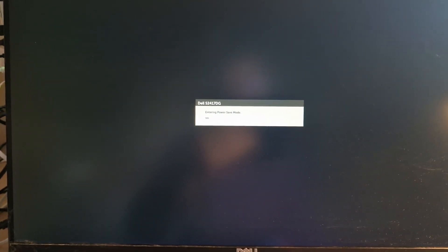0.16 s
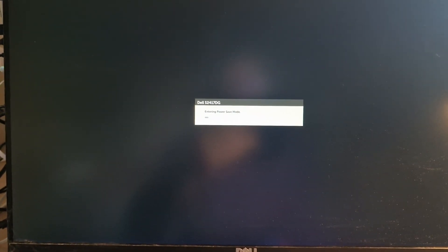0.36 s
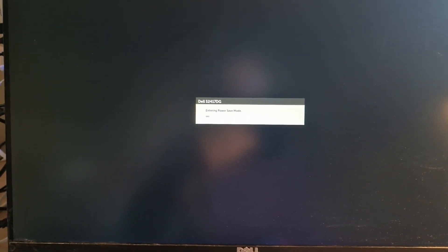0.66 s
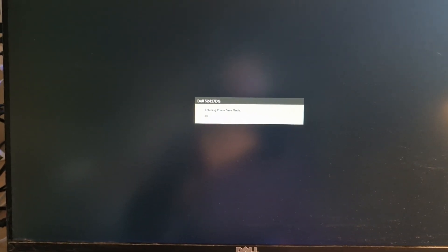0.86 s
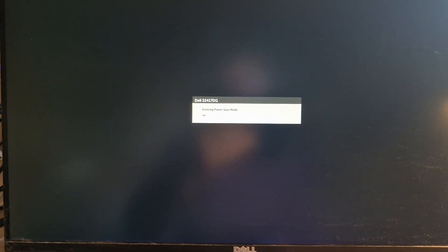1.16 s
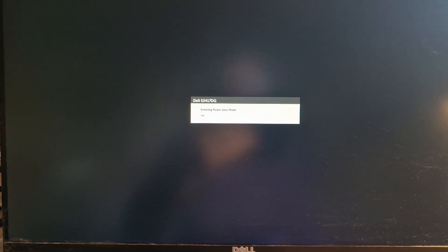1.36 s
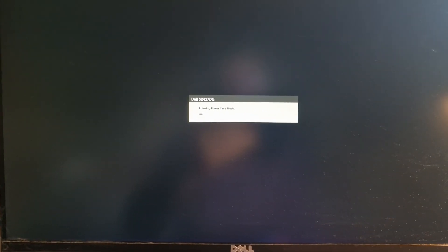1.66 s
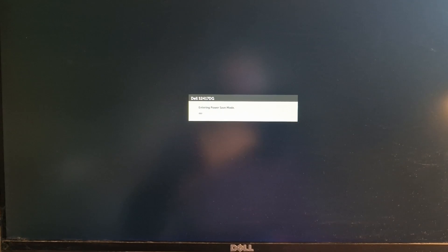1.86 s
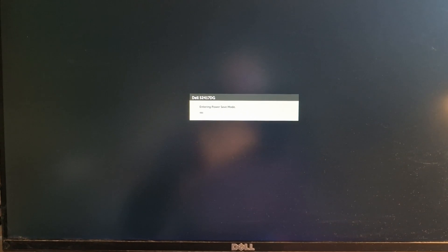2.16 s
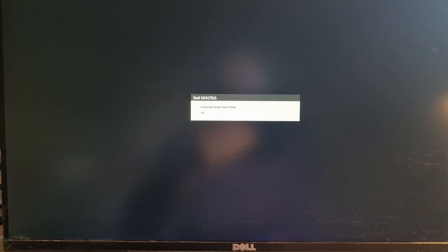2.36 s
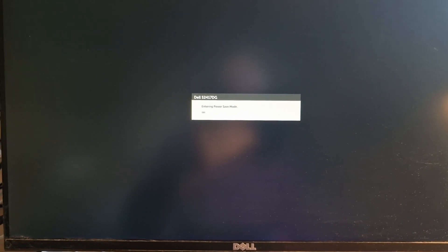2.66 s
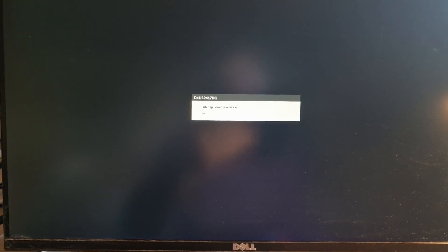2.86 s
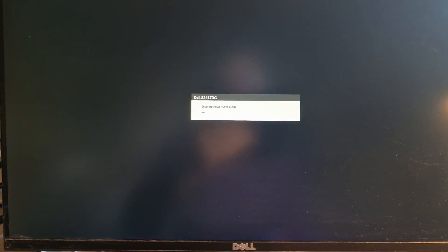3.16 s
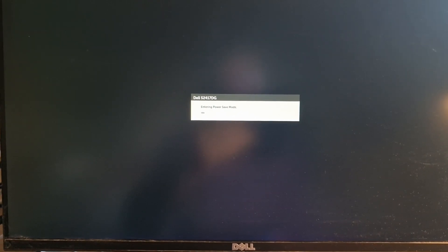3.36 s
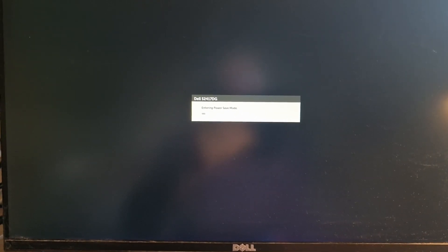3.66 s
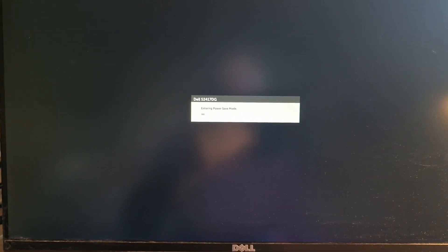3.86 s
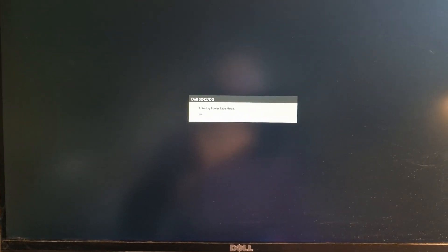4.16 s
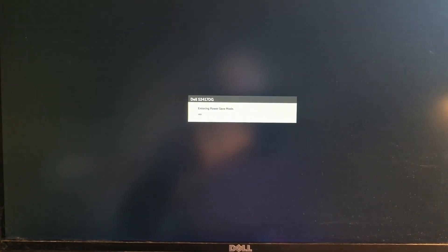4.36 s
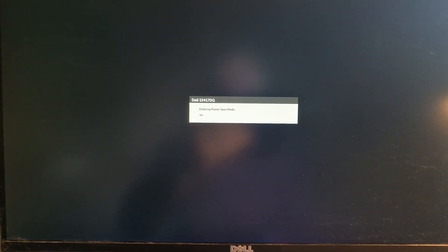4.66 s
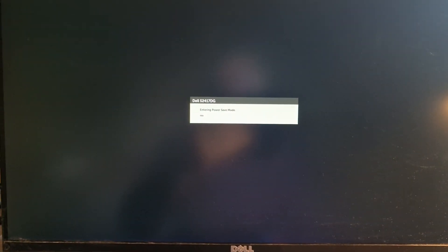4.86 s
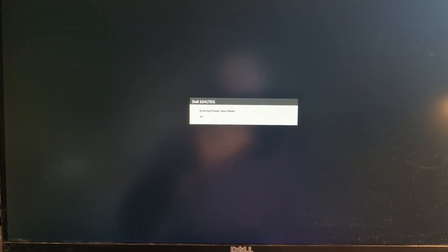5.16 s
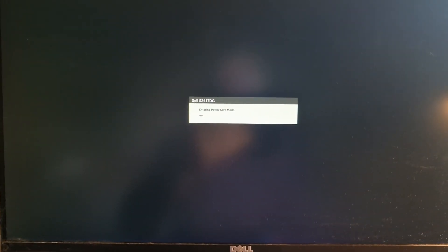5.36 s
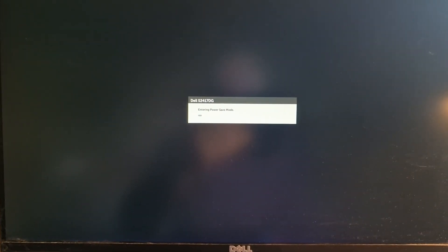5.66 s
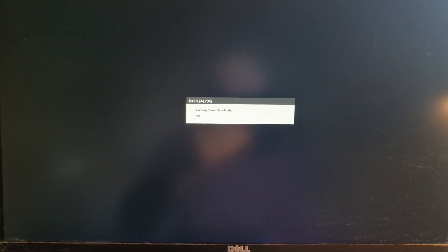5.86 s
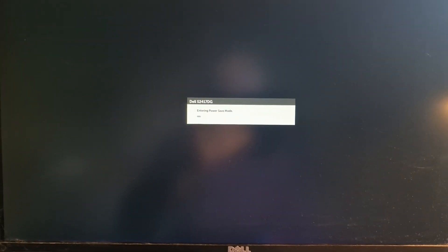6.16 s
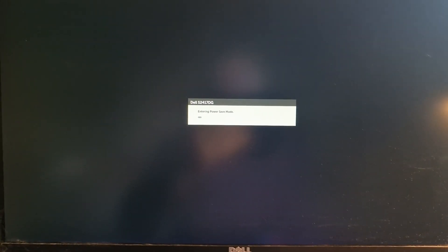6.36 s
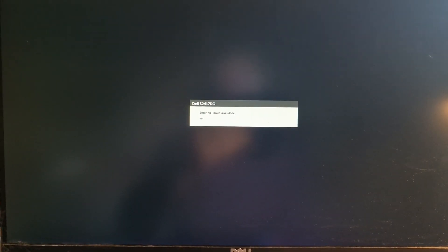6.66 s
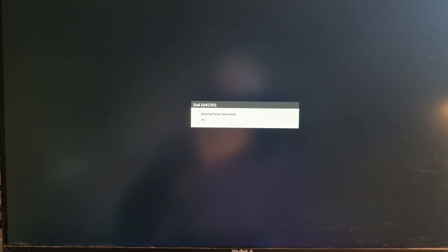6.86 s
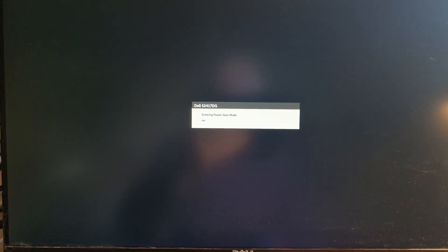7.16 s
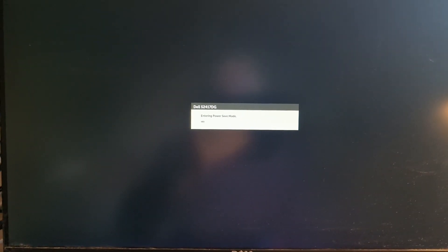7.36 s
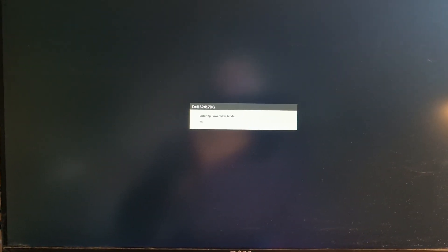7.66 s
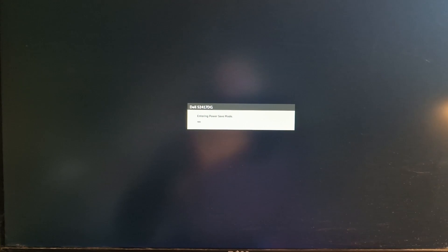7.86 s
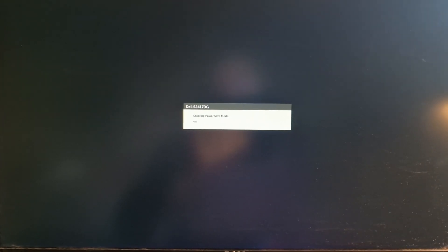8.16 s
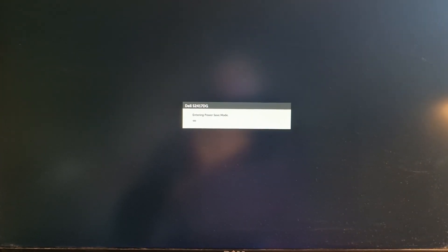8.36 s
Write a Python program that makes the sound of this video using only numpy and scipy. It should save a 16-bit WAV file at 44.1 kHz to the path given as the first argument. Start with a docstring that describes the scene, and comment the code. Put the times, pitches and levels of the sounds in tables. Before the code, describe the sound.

A soft rush of air and droning fan hum swells quickly, holds with a slow beating waver, then sinks and fades at the end.

```python
"""A low rush of air over room rumble is heard first: a desktop computer's twin nine-blade fans, already turning,
speed up past their cruise rate, settle and coast down beside a handheld stereo microphone.
Blade tones are sine pairs that beat; motor orders sweep through resonances of the case; air is shaped noise.
Three small ticks are rung resonances with echoes, panel hums are sines of wandering phase,
and rumble, electrical hum and hiss form a quiet floor."""
import sys
import numpy as np
from scipy import signal
from scipy.fft import rfft, irfft, next_fast_len
from scipy.io import wavfile
from scipy.ndimage import uniform_filter1d, map_coordinates

SR = 44100
rng = np.random.default_rng(int(sys.argv[2]) if len(sys.argv) > 2 else 0)


def persist_wave(psi):
    """Save psi, clipped to +-1, as 16-bit WAV."""
    counts = np.round(np.clip(psi, -1, 1) * 32767).astype(np.int16)
    wavfile.write(sys.argv[1], SR, np.atleast_2d(counts).T)


N = 375291

# Shaft speed commands: t/s, target speed/(turns/s), time constant/s
SPEED_COMMANDS = [(0, 36.64, .866), (1.835, 30.72, .866), (6.95, 0, 3.6)]
START_TURNS_PER_S, CRUISE_TURNS_PER_S, EASE_S = 24.5, 30.72, 0.4  # EASE_S: averaging time of a speed change

# Air flow through the case, scaled by each flow law below: t/s, level/dB
FLOW_LEVEL = [(0, -9), (.5, -3.5), (1, -2), (2, -1), (3, -2.5), (3.5, -1), (6.5, 0.7), (7.2, -4.5),
              (7.6, -8.5), (8, -12.5), (8.51, -14)]
# Flow noise laws: level/dB at cruise and 0 dB flow, dB per dB of flow, power of relative speed
DRONE_LAW, WHIR_LAW, WHOOSH_LAW = (-53, 1.02, 0.1), (-52.5, 0.52, 1.1), (-57, 0.92, 1)
# Blade-tip hiss, same columns
TIP_LAW = (-70, 1.9, 2.7)
# Relative noise spectra of case boom, blade whir, grille whoosh and blade-tip hiss: f/Hz, level/(dB per Hz)
DRONE_SPECTRUM = [(60, -53.5), (100, -29.5), (108, -23), (120, -5), (145, -6.5), (160, -6), (173, 2.5),
                  (185, -6), (196, -13), (210, -10.5), (240, -6), (258, -21.5), (300, -72)]
WHIR_SPECTRUM = [(200, -47.5), (255, -8), (275, -2), (320, 2), (350, -3), (362, -8), (378, -5),
                 (425, -19.5), (520, -23), (700, -36), (900, -65)]
WHOOSH_SPECTRUM = [(330, -32), (425, -5.5), (450, -3.5), (490, -0.5), (527, -1), (565, -3.5), (625, -1.5),
                   (720, -10.5), (769, -6.5), (886, -9.5), (1180, -13), (1390, -10.5), (1530, -17),
                   (1660, -17.5), (1970, -24), (2200, -24.5), (2550, -32.5), (3500, -42.5), (4550, -61.5),
                   (7700, -120)]
TIP_SPECTRUM = [(900, -41), (1450, -6.5), (1630, -1.5), (1970, -7), (2200, -4), (2550, -13.5), (2820, -12),
                (3500, -19), (4500, -29), (5500, -44.5)]
# Slow swell of the drone: t/s, level/dB
DRONE_SWELL_LEVEL = [(0, -3.5), (.7, -1), (1.2, 0), (2.6, -1), (3.2, 1), (4.4, 0), (5.2, 0), (6.2, -2.5),
                     (7, 0.5), (8.51, 2.5)]
# Likeness of the two noise channels: f/Hz, correlation (no unit)
CHANNEL_CORRELATION = [(30, 0.92), (120, 1), (300, 0.9), (450, 1), (650, 0.47), (1000, 0.38), (2000, 0.16),
                       (4000, 0.22), (8000, 0.51)]

# Relative spectra of room rumble and high hiss: f/Hz, level/(dB per Hz)
ROOM_SPECTRUM = [(15, -29), (25, -11), (40, -9), (65, -2.5), (95, -5), (130, -4.5), (280, -4), (420, -27.5),
                 (700, -30.5), (1150, -32), (1350, -20), (1500, -41), (2000, -49), (2600, -55),
                 (4000, -70.5)]
HISS_SPECTRUM = [(1500, -44), (2600, -10.5), (3600, -4.5), (4400, -3), (5300, -1.5), (6000, -4.5),
                 (6600, -1.5), (7300, -0.5), (7700, -5.5), (8200, -35.5), (9000, -50.5)]
# High hiss: t/s, level/dB
HISS_LEVEL = [(0, -81), (.9, -82), (1.3, -78.5), (2.9, -82), (6.5, -82), (7.5, -85.5), (8.51, -86.5)]
# Electrical hum in the room: f/Hz, level/dB
ELECTRICAL_HUM = [(59.8, -84), (120, -73)]

# Slip of the slower twin behind the faster: t/s, blade pitches lost (count)
TWIN_SLIP = [(0, -1), (.53, .5), (.72, 1), (.95, 1.5), (1.15, 2.5), (1.85, 4.5), (2.35, 5.5), (2.75, 6.5),
             (3.06, 7.5), (3.5, 8.5), (4.15, 10.5), (4.4, 11.5), (5.1, 13.5), (5.75, 15.5), (6.12, 16.5),
             (6.7, 18.5), (7.2, 19.5), (7.9, 21), (8.51, 23)]
# Motor torque ripple: t/s, level/dB of the faster fan, level/dB of the slower twin
MOTOR_DRIVE = [(0, -68, -67), (.13, -59, -70), (.22, -55, -66), (.3, -56, -62), (.4, -56, -57),
               (.5, -56, -62), (.68, -56, -69), (.77, -66, -58), (.88, -60, -58), (1.02, -57, -57.5),
               (1.14, -54, -63), (1.2, -63, -62), (1.3, -61.5, -66), (1.55, -66, -64), (1.68, -66, -58),
               (1.9, -68, -62), (2, -74.5, -68.5), (2.55, -71, -66.5), (3, -73.5, -66), (3.7, -71, -64.5),
               (4.2, -68, -74), (4.7, -64, -71.5), (5.7, -63, -71), (6.7, -64, -70), (6.95, -72, -64),
               (7.15, -76, -67.5), (7.4, -84, -77), (8.51, -92, -93)]
# Motor orders: multiple of shaft speed (no unit), relative level/dB
MOTOR_ORDERS = [(32, -8), (36, -5.5), (40, -7), (44, -8.5), (48, -16.5)]
# Case frame modes: f/Hz, width/Hz of one stage, gain/dB for the faster fan, gain/dB for the slower twin
FRAME_MODES = [(990, 36, -10, -23.5), (1056, 44, 0.5, -16), (1103, 36, -7, -8), (1258, 34, -12, 1),
               (1310.4, 60, -6.5, 3), (1359, 60, 1, -4), (1530, 73, -11.5, -12)]
# Waver of the blade tone, then of the shake: t/s, level/dB
BLADE_WAVER = [(0, 0), (.25, 3), (.55, -7), (.75, -3), (1.05, -5.5), (1.3, 2), (1.7, -4.5), (2.1, 0.5),
               (2.5, 4), (2.75, -3.5), (2.9, -4), (3.6, -5), (3.95, 5), (4.27, -13.5), (4.6, 4), (4.95, -4),
               (5.4, 3), (5.95, -5), (6.25, 2.5), (6.6, -4.5), (6.95, 2), (7.15, -8), (7.35, 3.5),
               (7.65, -3), (7.9, 11), (8.2, -9)]
SHAKE_LEVEL_WAVER = [(.9, -5.5), (1.25, 3.5), (1.45, -4.5), (1.65, 0.5), (2.0, 0.5), (2.2, -2), (2.4, 3),
                     (2.6, -8.5)]
BLADES, BLADE_DB, BLADE_POWER = 9, -55.5, 8.24  # count, level at cruise, power of relative speed
TWIN_SHARE, THIRD_DB = 0.66, -78  # amplitude ratio of the twin; third harmonic at 0 dB flow
SHAKE_ORDER, SHAKE_DB = 8, -47  # multiple of the shaft; level on resonance
SHAKE_MODE = (281.7, 19)  # f/Hz, width/Hz of one stage
SHAKE_TWIN, SHAKE_LAG_RAD = 0.35, 3.4  # amplitude ratio of the twin; phase offset of the faster fan

# Ticks: t/s, peak level/dB before panning, left-right level/dB, main f/Hz, its width/Hz, second f/Hz,
# second level/dB, crack level/dB, echo level/dB, time for echoes to fall 60 dB/s
TICK_EVENTS = [(0.2047, -52, 3, 4200, 750, 3200, -1, -18, -29, 0.07),
               (0.2658, -54, 6.5, 7800, 900, 5850, -11, -18, -28, 0.15),
               (1.955, -48, 1.5, 4950, 950, 6500, -15, -23, -30, 0.11)]

# Panel modes: f/Hz, wander rate/Hz (the mode's width), phase wander that differs between ports/rad
THIN_PANEL_MODES = [(275.4, 6.8, 0.13), (531, 24, 0.86), (1335, 70, 1)]
# One swell per panel mode: full from t/s, full until t/s, level/dB, rise/(dB/s), fall/(dB/s)
PANEL_SWELLS = [(7.82, 7.94, -56, 73, 33.5), (3.5, 6.8, -65, 20.5, 11), (7.2, 7.7, -78, 1.5, 12)]

# Left port level over right: f/Hz, level/dB
PORT_LEVEL = [(30, -0.7), (100, 1), (180, 0.5), (300, 0), (520, 0), (890, 4), (1520, 6), (2610, 5.5),
              (4480, 4), (7680, 16)]
# Phase by which the left port leads the right: f/Hz, phase/rad
PORT_LEAD = [(0, -2.5), (260, 0.12), (520, 0.89), (1030, 1.5), (1380, 2), (1810, 5), (2150, 6.5),
             (2840, 6.5), (3790, 10.5), (4390, 12.5), (6030, 15), (6720, 11), (7840, 23.5)]
# Gain that turns unit white noise into converter hiss: f/Hz, level/dB
CONVERTER_GAIN = [(8500, -99), (10000, -99), (11200, -93.0), (11600, -91), (13500, -91.0), (15500, -92.0)]
MIC_HZ, TOP_HZ = 8200, 15700  # microphone cutoff; highest frequency kept


def amp(db):
    """Amplitude ratio: 20 dB is a factor of ten."""
    return 10 ** (np.asarray(db) / 20)


def unit(x):
    """Normalization to unit rms."""
    return x / np.sqrt(np.mean(x ** 2) + 1e-20)


def along(points, hz):
    """Linear interpolation of (f/Hz, value) points on a logarithmic frequency axis."""
    f, value = np.transpose(points)
    return np.interp(np.log(hz + 1), np.log(f + 1), value)


def curves(rows):
    """Linear interpolation in time: one curve for each column after t/s."""
    t, *columns = np.transpose(rows)
    return [np.interp(np.arange(N) / SR, t, column) for column in columns]


def wobble(rate):
    """Band-limited random modulation: a smooth curve through `rate` random knots per second."""
    coarse = np.arange(0, N + 32, 32)
    knots = rng.standard_normal(int(N * rate / SR) + 4)
    return np.interp(np.arange(N), coarse, map_coordinates(knots, [coarse * rate / SR]))


def filtered(x, response):
    """Linear filtering: the spectrum of x times a complex response of frequency."""
    m = next_fast_len(N + SR // 2)
    return irfft(rfft(x, m) * response(np.fft.rfftfreq(m, 1 / SR)), m)[..., :N]


def resonance(f, hz, width):
    """Damped harmonic oscillator: a causal band-pass of unit gain at its centre."""
    return 1j * f * width / (hz * hz - f * f + 1j * f * width)


def rush(spectrum, patchy_db):
    """Turbulent noise: partly correlated channels with patches of random gain, scaled to unit rms."""
    z = signal.stft(rng.standard_normal((2, N + 512)), nperseg=512)[2]
    patches = uniform_filter1d(rng.standard_normal(z.shape[1:]), size=4, axis=0)
    patches = uniform_filter1d(patches, size=14, axis=1)
    pair = signal.istft(z * amp(patchy_db * unit(patches)), nperseg=512)[1][:, :N]

    def mid_side_gain(hz):
        # half the angle whose cosine is the channel correlation
        turn = np.arccos(np.clip(along(CHANNEL_CORRELATION, hz), -1, 1)) / 2
        return amp(along(spectrum, hz)) * [np.cos(turn), np.sin(turn)]

    mid, side = filtered(pair, mid_side_gain)
    return unit(np.array([mid + side, mid - side]))


def shaft():
    """First-order lag: speed in turns per second approaches each command exponentially, then is smoothed."""
    pad = round(EASE_S * SR)
    t = np.arange(-pad, N + pad) / SR
    speed = np.full(len(t), START_TURNS_PER_S)
    for s, goal, lag_s in SPEED_COMMANDS:
        approach = goal + (np.interp(s, t, speed) - goal) * np.exp((s - t) / lag_s)
        speed = np.where((t >= s) | (s == 0), approach, speed)
    return uniform_filter1d(speed, size=pad)[pad:-pad]


def air(speed):
    """Flow noise: turbulence booms in the case, whirs at the blades and whooshes through the grilles."""
    (flow_db,) = curves(FLOW_LEVEL)
    (swell_db,) = curves(DRONE_SWELL_LEVEL)
    pace = speed / CRUISE_TURNS_PER_S

    def law(db, per_flow, power):
        return amp(db + per_flow * flow_db) * pace ** power

    drone = law(*DRONE_LAW) * amp(swell_db + 0.79 * wobble(8.7)) * rush(DRONE_SPECTRUM, patchy_db=1.5)
    whir = law(*WHIR_LAW) * amp(0.46 * wobble(5.0)) * rush(WHIR_SPECTRUM, patchy_db=1.87)
    whoosh = law(*WHOOSH_LAW) * amp(0.14 * wobble(4.4)) * rush(WHOOSH_SPECTRUM, patchy_db=1.5)
    # blade-tip hiss grows steeply with speed
    tips = law(*TIP_LAW) * amp(0.65 * wobble(5.2)) * rush(TIP_SPECTRUM, patchy_db=2.5)
    return drone + whir + whoosh + tips


def background():
    """Superposition of independent sources: room rumble, wavering electrical hum and high hiss."""
    (hiss_db,) = curves(HISS_LEVEL)
    t, waver = np.arange(N) / SR, wobble(6.7)
    rumble = amp(-68.0) * rush(ROOM_SPECTRUM, patchy_db=1.5)
    hum = sum(amp(db + 1.2 * waver) * np.sqrt(2) * np.sin(2 * np.pi * hz * t) for hz, db in ELECTRICAL_HUM)
    return rumble + hum + amp(hiss_db) * rush(HISS_SPECTRUM, patchy_db=1.86)


def shaft_angles(speed):
    """Phase is the integral of speed: angles in radians of the faster fan and its slipping twin."""
    angle = 2 * np.pi * np.cumsum(speed) / SR + 0.024 * wobble(6)
    (pitches,) = curves(TWIN_SLIP)
    half_slip = np.pi * uniform_filter1d(pitches, size=SR // 4) / BLADES
    return np.array([angle + half_slip, angle - half_slip])


def beating_pair(angles, order, share, lag):
    """Interference: two sines of nearly equal frequency beat at their difference."""
    fast, slow = angles
    return np.sin(order * fast + lag) + share * np.sin(order * slow)


def motors(angles):
    """Forced resonance: torque ripple at multiples of four of the shaft swells as it crosses frame modes."""
    jittered = angles + 0.015 * np.array([wobble(20), wobble(20)])
    ripple = 0
    for order, db in MOTOR_ORDERS:
        phase = rng.uniform(0, 2 * np.pi, (2, 1))
        ripple = ripple + amp(db + 1.9 * wobble(14)) * np.sin(order * jittered + phase)

    def frame(f):
        return sum(amp([[fast_db], [slow_db]]) * resonance(f, hz, width) ** 2
                   for hz, width, fast_db, slow_db in FRAME_MODES)

    return np.sqrt(2) * filtered(amp(curves(MOTOR_DRIVE)) * ripple, frame).sum(axis=0)


def blade_tone(speed, angles):
    """Blade-passing tone: nine pulses per turn, with a level rising as a power of speed, and its third harmonic."""
    (waver_db,), (flow_db,) = curves(BLADE_WAVER), curves(FLOW_LEVEL)
    level = amp(BLADE_DB + waver_db + 0.97 * wobble(18)) * (speed / CRUISE_TURNS_PER_S) ** BLADE_POWER
    tone = level * beating_pair(angles, BLADES, TWIN_SHARE, 0)
    third = amp(THIRD_DB + flow_db) * beating_pair(angles, 3 * BLADES, TWIN_SHARE, 0)
    return np.sqrt(2) * (tone + third)


def shake(speed, angles):
    """Resonant response: the eighth shaft order is strongest where its frequency meets the mode."""
    (waver_db,) = curves(SHAKE_LEVEL_WAVER)
    gain = np.abs(resonance(SHAKE_ORDER * speed, *SHAKE_MODE)) ** 2
    level = amp(SHAKE_DB + waver_db + 0.76 * wobble(13)) * gain
    return np.sqrt(2) * level * beating_pair(angles, SHAKE_ORDER, SHAKE_TWIN, SHAKE_LAG_RAD)


def ticks():
    """Impulse response: a brief broken crack with two short resonances, followed by a spray of echoes."""
    out, t = np.zeros((2, N)), np.arange(SR // 8) / SR
    f = np.fft.rfftfreq(len(t), 1 / SR)
    broad = resonance(f, 5500, 5000) ** 2
    for s, db, pan_db, main_hz, width_hz, second_hz, second_db, crack_db, echo_db, t60 in TICK_EVENTS:
        onset = np.minimum(t / 0.002, 1)
        echoes = amp(echo_db - 60 * t / t60) * onset * rng.standard_normal((2, len(t)))
        body = resonance(f, main_hz, width_hz) ** 2
        body = body + amp(second_db) * resonance(f, second_hz, 330) ** 2
        broken = 1 + rfft(0.2 * amp(-60 * t / 0.005) * rng.standard_normal(len(t)))
        crack = amp(crack_db) * broad * broken
        click = irfft(body + crack + rfft(echoes) * (body + 0.4 * broad), len(t))
        gain = amp(db + np.array([[pan_db], [-pan_db]]) / 2)
        out[:, round(s * SR):][:, :len(t)] += gain * click / np.abs(click).max()
    return out


def panel():
    """Narrow-band vibration: air pressure shakes thin panels, whose phase wanders as fast as the mode is wide."""
    t = np.arange(N) / SR
    total = 0
    for (hz, width, apart), (start, end, db, rise, fall) in zip(THIN_PANEL_MODES, PANEL_SWELLS):
        port_wander = apart * np.array([wobble(width), wobble(width)])
        phase = 2 * np.pi * hz * t + 1.1 * wobble(width) + port_wander
        hum = amp(2.6 * wobble(width)) * np.sin(phase)
        level_db = db - rise * np.maximum(start - t, 0) - fall * np.maximum(t - end, 0)
        total = total + amp(level_db) * unit(hum)
    return total


def scene():
    """Two-port reception: phase and level differences place all but the ticks, the treble louder at left."""
    side = np.array([[.5], [-.5]])

    def ports(hz):
        return amp(side * along(PORT_LEVEL, hz)) * np.exp(1j * side * along(PORT_LEAD, hz))

    speed = shaft()
    angles = shaft_angles(speed)
    rotor = motors(angles) + blade_tone(speed, angles) + shake(speed, angles)
    return filtered(air(speed) + background() + rotor + panel(), ports) + ticks()


def record(dry):
    """Band limitation: the microphone path ends near 8 kHz, with faint converter hiss above it."""
    heard = filtered(dry, lambda hz: 1 / np.sqrt(1 + (hz / MIC_HZ) ** 60))
    faint = filtered(rng.standard_normal((2, N)), lambda hz: amp(along(CONVERTER_GAIN, hz)))
    return filtered(heard + faint, lambda hz: hz < TOP_HZ)


dry = scene()
out = record(dry)
persist_wave(out)
```